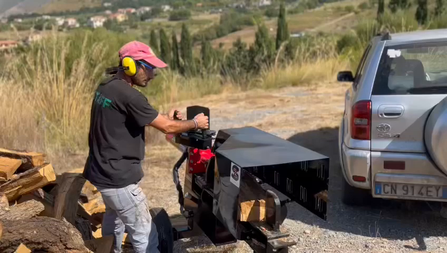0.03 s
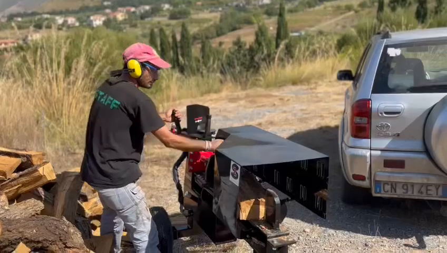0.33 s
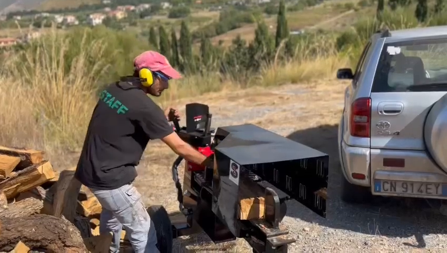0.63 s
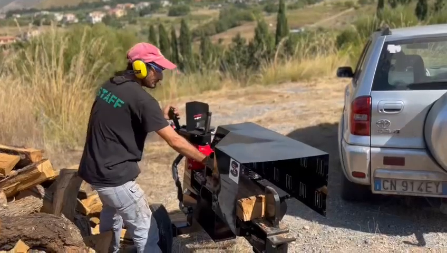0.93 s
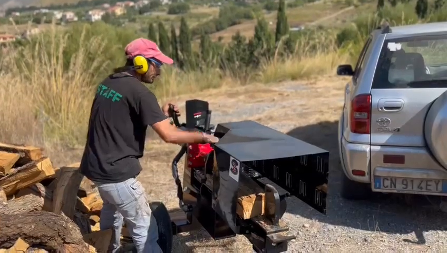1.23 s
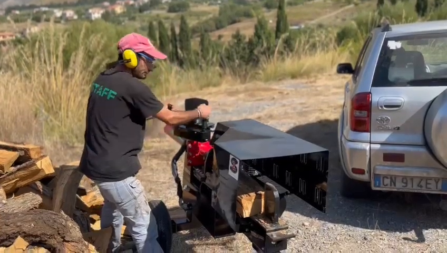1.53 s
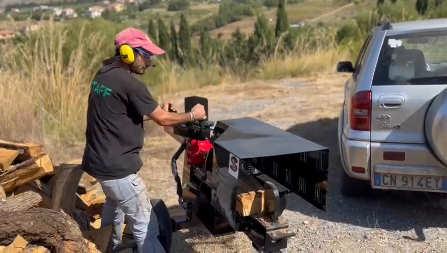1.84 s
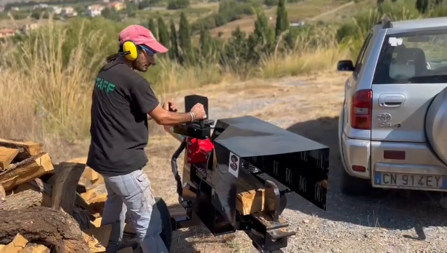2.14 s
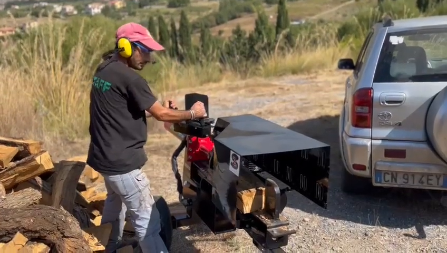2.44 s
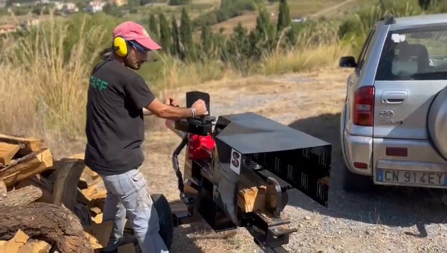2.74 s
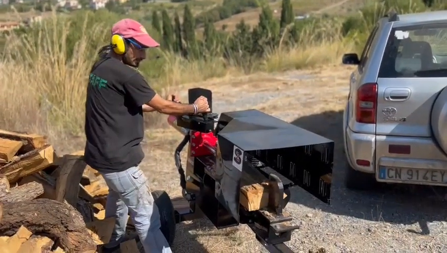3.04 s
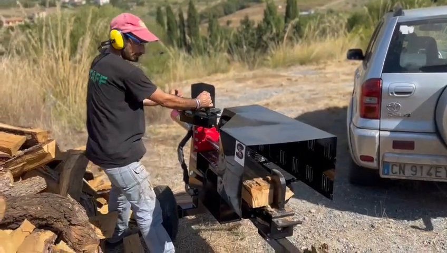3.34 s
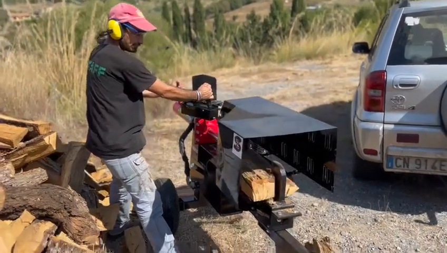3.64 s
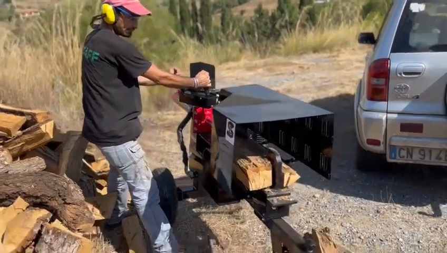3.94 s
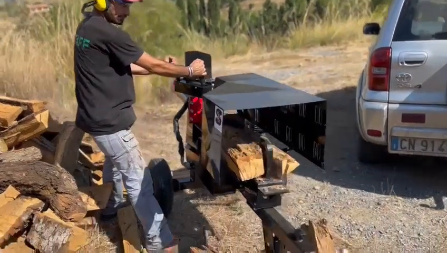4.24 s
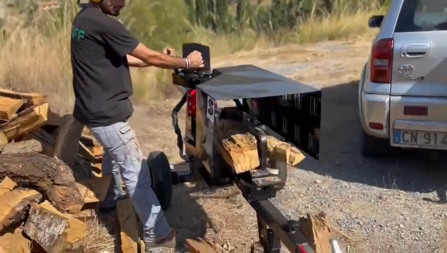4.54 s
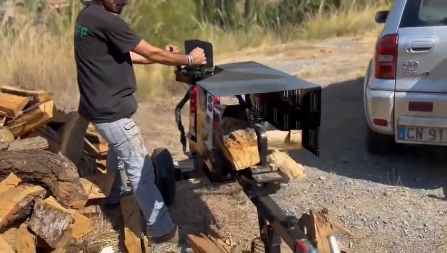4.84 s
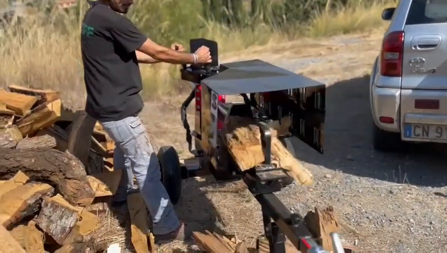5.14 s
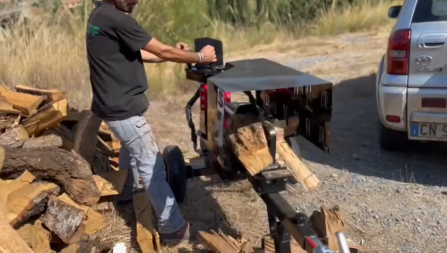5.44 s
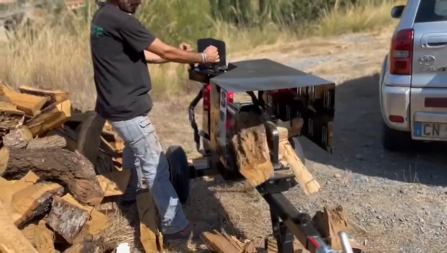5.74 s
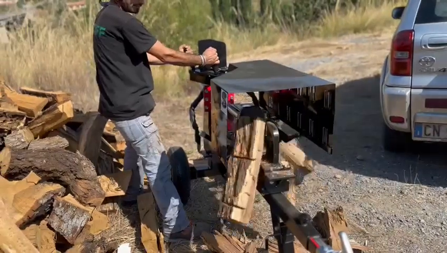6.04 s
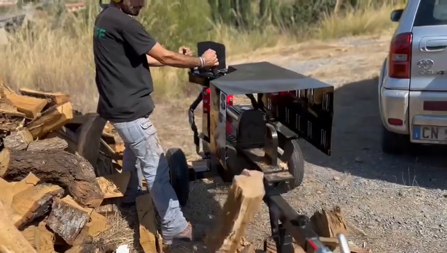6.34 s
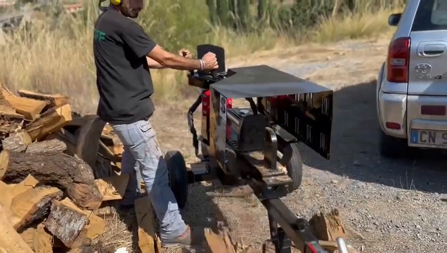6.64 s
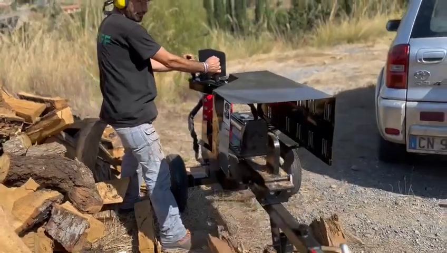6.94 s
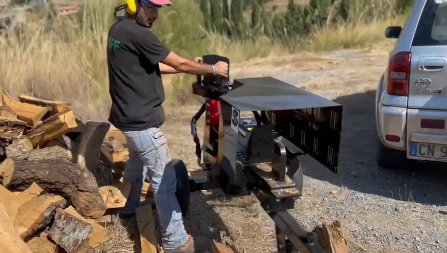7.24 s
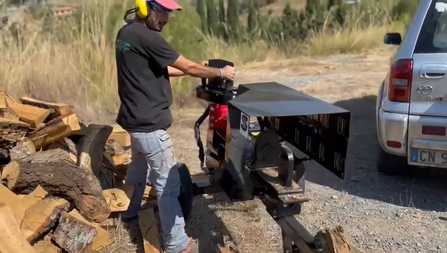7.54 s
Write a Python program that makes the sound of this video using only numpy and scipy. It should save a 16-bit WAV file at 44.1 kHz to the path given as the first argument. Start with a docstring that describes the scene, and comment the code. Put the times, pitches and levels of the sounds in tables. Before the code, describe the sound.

Wood snaps and grinds against a splitter's wedge over a steady, rattling engine, and a split piece knocks down on stones.

```python
"""Outdoors on gravel, a petrol log splitter runs at a governed speed. Its one four-stroke cylinder puffs
through a muffler, rattles the casing, rings its panels and drives a hissing fan and a whining pump.
The ram takes up load and the log fractures on the wedge: fibres tear, the wood cracks and rings, the
steel bed knocks, and stick-slip friction makes the halves groan and squeak. A split piece drops on the
stones and topples over, and the whine shifts upward as the ram runs back."""
import sys
import numpy as np
from scipy import signal
from scipy.fft import rfft, irfft
from scipy.io import wavfile
from scipy.ndimage import uniform_filter1d

SR = 44100
rng = np.random.default_rng(int(sys.argv[2]) if len(sys.argv) > 2 else 0)


def to_wav(s):
    """Save 16-bit WAV."""
    ch = np.atleast_2d(s).T  # columns
    pcm = np.round(np.clip(ch, -1, 1) * 32767)  # PCM
    wavfile.write(sys.argv[1], SR, pcm.astype(np.int16))


N = 343980
TIME = np.arange(N) / SR
DIRECT = np.array([[1], [0]])   # of the two sound paths, direct and scattered, only the first


def from_db(db):
    """Decibels to amplitude ratio."""
    return 10 ** (np.asarray(db) / 20)


def rms_one(x):
    """Normalisation to rms 1."""
    return x / np.sqrt(np.mean(x ** 2) + 1e-20)


def in_time(rows):
    """Linear interpolation of each column at every sample."""
    times, *columns = np.transpose(rows)
    return [np.interp(TIME, times, column) for column in columns]


def colour(x, points):
    """Zero-phase filtering by an outline of (frequency_hz, gain_db)."""
    hz, db = np.transpose(points)
    bins = np.maximum(np.arange(N // 2 + 1) * SR / N, 1)
    return irfft(rfft(x) * from_db(np.interp(np.log(bins), np.log(hz), db)), N)


def drift(rate):
    """Random fluctuation of rms 1, with `rate` new values a second."""
    knots = rng.standard_normal(4000)
    return rms_one(np.interp(TIME * rate, np.arange(len(knots)), knots))


def noise():
    """Uncorrelated white noise on each path."""
    return rng.standard_normal((2, N))


def grains(per_s, spread_db):
    """A Poisson train of uneven clicks, with a separate strength on each path."""
    born = rng.random(N) < per_s / SR
    size = from_db(spread_db * np.minimum(rng.exponential(1, N), 4))
    return rms_one(born * size * noise())


def repeating(phase, size=1024):
    """Periodic noise: each path repeats a rough pattern on every cycle."""
    patterns = rng.standard_normal((2, size))
    return np.array([rms_one(np.interp(phase % 1, np.arange(size) / size, p)) for p in patterns])


def once_a_cycle(phase, place, width):
    """A Gaussian pulse at one place in the engine cycle."""
    return np.exp(-.5 * (((phase - place + .5) % 1 - .5) / width) ** 2)


def swell(start, hold, attack, release):
    """An exponential rise up to the start time, a hold and an exponential decay."""
    early, late = np.maximum(start - TIME, 0), np.maximum(TIME - start - hold, 0)
    return np.exp(-np.minimum(early / attack + late / release, 20))


def burst(start, length):
    """An envelope that holds for about its length, then falls as the inverse square of time."""
    age = np.maximum(TIME - start, 0)
    return (1 - np.exp(-age / .0003)) / np.sqrt(1 + (age / length) ** 4)


def resonate(x, hz, width):
    """Forced response of a two-pole resonator with peak gain 1."""
    r = np.exp(-np.pi * abs(width) / SR)
    feedback = [1, -2 * r * np.cos(2 * np.pi * hz / SR), r * r]
    return signal.lfilter(np.array([1, 0, -1]) * (1 - r * r) / 2, feedback, x + 1e-18)


def struck(start, hz, t60):
    """Free decay of one damped mode after a blow."""
    age = np.maximum(TIME - start, 0)
    return from_db(-60 * np.minimum(age / t60, 3)) * np.sin(2 * np.pi * hz * age)


def crank_throb(phase, level_db):
    """A four-stroke crank turns twice a cycle, so it throbs at the second harmonic."""
    return np.sqrt(2) * from_db(level_db + .13) * np.cos(4 * np.pi * (phase - .03)) * DIRECT


# muffler chambers: resonance_harmonic, delay_turns, round_trip_cycles, straight_share
MUFFLER_CHAMBERS = [(3.5, .47, .236, .92), (7.5, .96, .134, .86), (14.5, .5, .134, .97)]
def muffler_lag(harmonics):
    """Dispersion: the pipe smears the puff, and each chamber echoes the band above its resonance."""
    lag = np.zeros(len(harmonics))
    for resonance, turns, trip, straight in MUFFLER_CHAMBERS:
        echo = np.exp(-2j * np.pi * harmonics * trip)
        all_pass = (straight + echo) / (1 + straight * echo)
        lag = np.where(harmonics > resonance, 2 * np.pi * turns - np.angle(all_pass), lag)
    return np.pi + .0081 * harmonics ** 2 + lag


def puff_train(phase, spectrum, lag, tilt_db, size=256):
    """Fourier synthesis of one puff per firing, without the crank throb and the steady engine tones."""
    orders, db = np.transpose(spectrum)
    k = np.arange(size // 2 + 1)
    roll_off_db = 36 * np.log2(np.maximum(k / orders[-1], 1))
    level_db = np.interp(k, orders, db) + tilt_db * k / orders[-1] - roll_off_db
    cepstrum = irfft(np.log(from_db(uniform_filter1d(level_db, size=5))))
    minimum_phase = 2 * rfft(cepstrum[:size // 2], size).imag   # the muffler rings after the puff
    lines = from_db(level_db) * np.exp(1j * (minimum_phase - lag[:len(k)]))
    lines *= ~np.isin(k, [0, 2] + [round(row[0]) for row in ENGINE_TONES])
    lines /= np.linalg.norm(lines[4:8]) * np.sqrt(2)
    cycle = irfft(lines, 8 * size) * 8 * size
    return np.interp(phase % 1, np.arange(len(cycle)) / len(cycle), cycle)


# exhaust spectra running free, pushing the log and at full load: harmonic, relative_db
FREE_SPECTRUM = [(1, -38.5), (2, 0.0), (3, -9.5), (4, -4.0), (5, -7.5), (6, -6.0), (7, -12.0), (8, -19.0),
                 (9, -9.5), (10, -10), (11, -12), (12, -11), (13, -19.5), (14, -22.5), (15, -22.5),
                 (17, -12), (18, -12.5), (19, -21.5), (20, -18.5), (21, -20), (23, -21.0), (24, -24.0),
                 (25, -22.5), (26, -18.5), (27, -17.5), (30, -19.0), (31, -22.5), (32, -19.0), (33, -25.5),
                 (34, -25.0), (35, -29.5), (36, -24.5), (37, -27.0), (38, -26.0), (39, -33.5), (40, -23.5),
                 (41, -30.5), (42, -25.5), (43, -27.0), (44, -25.5), (45, -24.5), (47, -21.5)]
PUSHING_SPECTRUM = [(1, -34.5), (2, 0.0), (3, -9.0), (4, -2.5), (5, -4.5), (6, -2.0), (7, -8.5), (8, -17.5),
                    (9, -15), (10, -15.5), (11, -16.0), (12, -14.0), (13, -10.5), (14, -25.0), (15, -20.0),
                    (17, -17.0), (18, -13.0), (19, -16.0), (20, -18), (21, -17.5), (23, -16.5), (24, -15.5),
                    (25, -20.0), (26, -19.5), (27, -21), (30, -20.5), (31, -24), (32, -20.0), (33, -32.5),
                    (34, -18.5), (35, -25.0), (36, -21.0)]
LOADED_SPECTRUM = [(1, -38.5), (2, 0.0), (3, -10.0), (4, -6.0), (5, -8.0), (6, -5.5), (7, -10.5),
                   (8, -17.5), (9, -10), (10, -14.5), (11, -16.5), (12, -10), (13, -12.5), (14, -20.0),
                   (15, -25.0), (17, -15.5), (18, -15), (19, -20.0), (20, -34.0), (21, -21.5), (23, -27.0),
                   (24, -19.5), (25, -22.0), (26, -18.0), (27, -19.0), (30, -25), (31, -32.0), (32, -25.5),
                   (33, -29.0), (34, -21.5), (35, -28.5), (36, -27.0), (37, -23.5), (38, -28.0),
                   (39, -28.5), (40, -16.5), (41, -38.5), (42, -22.5), (43, -31.5), (44, -24.0),
                   (45, -20.0), (47, -24.5)]
def exhaust_note(phase, load, level_db):
    """Periodic puffs give a harmonic series whose balance follows the load."""
    uneven = phase + .00097 * drift(45)   # no two firings are alike
    k = np.arange(1000)
    scatter = np.clip((k - 8) / 18, 0, 3) * rng.standard_normal(len(k))   # high orders take many paths
    lag = muffler_lag(k) + scatter
    free, loaded = np.clip(1 - 2 * load, 0, 1), np.clip(2 * load - 1, 0, 1)
    note = (free * puff_train(uneven, FREE_SPECTRUM, lag, tilt_db=-4)
            + (1 - free - loaded) * puff_train(uneven, PUSHING_SPECTRUM, lag, tilt_db=3)
            + loaded * puff_train(uneven, LOADED_SPECTRUM, lag, tilt_db=-3))
    return note * from_db(level_db + .14 + .5 * drift(31)) * DIRECT


# blows of exhaust, muffler rattle, valve and piston: place_cycles, width_cycles, strength
CYCLE_BLOWS = [(.06, 0.012, 0.24), (.25, 0.086, 0.29), (.74, 0.076, 2.9), (0.9, 0.029, 0.62)]
def blows(phase):
    """Periodic excitation: four pulses in each cycle."""
    return sum(strength * once_a_cycle(phase, place, width) for place, width, strength in CYCLE_BLOWS)


# spectra of the rough gas and of its bark: frequency_hz, gain_db
GAS_SPECTRUM = [(20, -1.5), (40, -7), (90, 1.5), (170, -2), (260, -2.5), (360, 0.5), (470, -6.5),
                (700, -10.5), (1000, -14.5), (1400, -38), (3000, -51.5)]
BARK_SPECTRUM = [(150, -25), (290, -4), (480, -0.5), (620, 3.5), (850, -1), (1100, -7.5), (1700, -14.5),
                 (3000, -52.5)]
def exhaust_gas(phase, gas_db):
    """Modulated flow noise: the gas surges on each blow and barks as the exhaust valve opens."""
    gas = rms_one(colour(noise() * (5 + blows(phase)), GAS_SPECTRUM))
    valve_open = once_a_cycle(phase, place=.049, width=.062)
    bark = rms_one(colour(noise() * valve_open, BARK_SPECTRUM))
    return gas * from_db(gas_db) + bark * from_db(-35.8)


# response of the casing: frequency_hz, gain_db
CASING_SPECTRUM = [(500, -44), (800, 2), (1100, 1), (1350, 1.5), (1700, -2), (2050, -2), (2450, -4.5),
                   (2900, -11.5), (3600, -17), (6000, -69)]
# panel modes: frequency_hz, nominal_width_hz, free_db, loaded_db
PANEL_MODES = [(900, 56, -36, -40.5), (1456, 62, -37.7, -60), (1418, 46, -56, -38.7)]
def clatter(phase, load, clatter_db):
    """Forced vibration: valve gear and pump rattle the casing, and each firing kicks its panels."""
    taps = 4 + .22 * blows(phase)
    rattle = noise() + .3 * repeating(phase + .0025 * drift(4)) + .64 * grains(2500, spread_db=4)
    casing = rms_one(colour(rattle * taps, CASING_SPECTRUM)) * from_db(clatter_db - .5)
    kick = 7 * once_a_cycle(phase, place=.9, width=.07)
    shaking = (noise() + .76 * repeating(phase)) * (taps + kick)
    panels = 0
    for hz, width, free_db, loaded_db in PANEL_MODES:
        ring = resonate(resonate(shaking, hz, 1.23 * width), hz, 1.23 * width)
        panels += rms_one(ring) * from_db(free_db + load * (loaded_db - free_db))
    return casing + panels * from_db(clatter_db - np.mean(clatter_db))


# spectrum of the cooling air: frequency_hz, gain_db
AIR_SPECTRUM = [(1650, -6.5), (2800, -11), (2910, 3.5), (3160, -2.5), (3620, 4), (3970, 1), (4350, 2.5),
                (5230, -2.5), (6280, 0), (7580, -3), (8260, -1.5), (9110, -5), (9980, -13.5),
                (10400, -30.5), (11000, -63), (14300, -68), (22000, -120)]
def cooling_air(phase, hiss_db):
    """Amplitude modulation: broadband fan hiss swells as the cylinder fires."""
    surge = 1 + .43 * once_a_cycle(phase, place=.75, width=.089)
    hiss = noise() + .42 * grains(2000, spread_db=1)
    return rms_one(colour(hiss * surge, AIR_SPECTRUM)) * from_db(hiss_db - 3.5)


# steady engine tones, the pump's whine (16-29) and the casing panels ringing near 1450 Hz (46-48):
# harmonic, free_db, pushing_db, loaded_db, returning_db
ENGINE_TONES = [(16, -38, -40, -33.5, -42), (22, -45, -35.5, -36, -49), (28, -42, -45, -48, -34.5),
                (29, -40, -45, -42.5, -38), (46, -48, -55, -41, -46), (47, -47, -55, -45, -52),
                (48, -41, -58, -45.5, -40)]
RETURN_S, RETURN_RISE_S = 7.08, .33   # the ram starts to run back
def engine_tones(phase, load):
    """Harmonics locked to the cycle: pump whine and panel ring change balance with the ram's work."""
    returning = np.clip((TIME - RETURN_S) / RETURN_RISE_S, 0, 1)
    from_crest = phase - .0572   # the partials crest together here
    tones = 0
    for harmonic, *working_db, return_db in ENGINE_TONES:
        db = (1 - returning) * np.interp(load, (0, .5, 1), working_db) + returning * return_db
        angle = 2 * np.pi * round(harmonic) * from_crest + .25 * drift(22)
        flutter_db = 1.8 * drift(12)
        tones += np.sqrt(2) * from_db(db + flutter_db) * np.cos(angle)
    return tones * DIRECT


# the governed speed sags while the ram works: time_s, firing_rate_hz
FIRING_RATE = [(0, 30.89), (1.6, 30.975), (1.9, 30.665), (2.6, 30.65), (2.9, 30.405), (3.6, 30.515),
               (5.2, 30.62), (5.7, 30.905), (6.7, 30.63), (7.2, 31.03), (7.8, 30.955)]
# hydraulic load (0 free, .5 pushing the split log, 1 forcing the wedge in): time_s, load_share
RAM_LOAD = [(0, 0.038), (1.7, 0.091), (1.86, 0.92), (3.58, 0.92), (3.72, 0.58), (4.3, 0.48), (6.85, 0.41),
            (7.15, 0.31), (7.8, 0.11)]
# nominal levels in those three states: throb_db, note_db, gas_db, clatter_db, hiss_db
FREE_LEVELS = (-24.5, -25.5, -31, -30.5, -35)
PUSHING_LEVELS = (-27.5, -25, -31.5, -32.5, -37)
LOADED_LEVELS = (-23, -25.5, -30.5, -29.5, -34.5)
# the steel guard comes between engine and listener, then clears: time_s, clatter_change_db
GUARD_SCREENING = [(0, 0), (4.2, 1), (5.5, -1), (6.8, 0), (7.4, 1.3)]
def engine():
    """Synchronous sources: all share one cycle and follow the load; the guard screens clatter and hiss."""
    (firing_hz,), (load,) = in_time(FIRING_RATE), in_time(RAM_LOAD)
    (screen_db,) = in_time(GUARD_SCREENING)
    phase = .508 + np.cumsum(firing_hz) / SR   # in cycles
    levels = zip(FREE_LEVELS, PUSHING_LEVELS, LOADED_LEVELS)
    throb_db, note_db, gas_db, clatter_db, hiss_db = (np.interp(load, (0, .5, 1), db) for db in levels)
    return (crank_throb(phase, throb_db) + exhaust_note(phase, load, note_db)
            + exhaust_gas(phase, gas_db) + clatter(phase, load, clatter_db + screen_db)
            + cooling_air(phase, hiss_db + 1.06 * screen_db) + engine_tones(phase, load))


# the log's resonances: frequency_hz, width_hz, gain_db
LOG_MODES = [(400, 200, -22), (680, 250, -15), (970, 340, 4.5), (1383, 204, 8.5), (1866, 113, 7),
             (2274, 255, 8), (2590, 660, 2), (3490, 790, -1), (4320, 560, 1), (6100, 3100, -3),
             (6900, 350, 3.5), (7520, 960, -6.5), (9500, 2900, -7.5)]
def log_body(force):
    """Modal superposition: snaps ring briefly in the damped wood."""
    return sum((-1) ** k * from_db(db) * resonate(force, hz, width)
               for k, (hz, width, db) in enumerate(LOG_MODES))


# resonances of the halves: frequency_hz, width_hz, level_re_grinding_db
GROAN_MODES = [(372, 37, -9), (620, 57, -9.5), (1206, 100, -14.5)]
def groaning(slips_per_s=75):
    """Stick-slip friction rings the log's halves, whose pitch bends as the wedge opens them."""
    travel = np.cumsum(slips_per_s * np.exp(.35 * drift(50))) / SR
    slips = np.diff(np.floor(travel), prepend=0) * from_db(2.7 * drift(40))
    bent_time = np.cumsum(1 + .025 * drift(7)) / SR
    return DIRECT * sum(from_db(db) * rms_one(np.interp(bent_time, TIME, resonate(slips, hz, width)))
                        for hz, width, db in GROAN_MODES)


# splinter resonances: frequency_hz, width_hz, relative_db
SPLINTER_MODES = [(1656, 60, -2), (1960, 110, -0.5), (2200, 68, 2), (2610, 98, 2.5)]
def splinters():
    """Impulse excitation: splinters snap at random and ring."""
    return rms_one(sum(from_db(db) * rms_one(resonate(grains(160, spread_db=0), hz, width))
                       for hz, width, db in SPLINTER_MODES))


# the log slips along the wedge: start_s, hold_s, grinding_db, tearing_db, crackling_db
LOG_SLIPS = [(2.762, 0.018, -26.5, -43, -39), (2.838, 0.33, -39, -35.5, -41), (3.42, 0.15, -42, -33.5, -36),
             (3.777, 0.045, -46, -34, -42), (3.975, 0.15, -30, -39, -42), (4.2, 0.12, -23.5, -35.5, -40),
             (4.516, 0.28, -32.5, -44.5, -45), (4.901, 0.097, -30, -38.5, -41),
             (5.07, 0.084, -27, -38, -46)]
# spectrum of wood grinding on steel: frequency_hz, gain_db
GRIND_SPECTRUM = [(120, -29), (250, 1), (335, 6), (395, 13.5), (465, -5), (560, 6), (645, 6.5), (740, 3),
                  (900, 6.5), (1150, 0), (1700, -3), (2400, -20), (3200, -28), (9000, -49)]
def splitting():
    """Fracture and friction: at each slip fibres tear, splinters snap and the halves grind the wedge."""
    tear, grind, crackle = np.zeros((3, N))
    for start, hold, grind_db, tear_db, crackle_db in LOG_SLIPS:
        motion = swell(start, hold, attack=.016, release=.088)
        tear += from_db(tear_db) * motion
        grind += from_db(grind_db) * motion
        crackle += from_db(crackle_db) * motion
    fibres = grains(1500 * from_db(5 * np.tanh(drift(40))), spread_db=2)
    tearing = rms_one(log_body(fibres)) * tear
    friction = grains(3000, spread_db=2) * from_db(2 * drift(60))
    grinding = (rms_one(colour(friction, GRIND_SPECTRUM)) + groaning()) * grind
    crackling = splinters() * crackle
    jerks = from_db(2.1 * np.clip(drift(24), -2, 2))   # the log advances in jerks
    return (tearing + grinding + crackling) * rms_one(jerks)


# the log cracks: start_s, level_db, length_s, brightness_db, pitch_hz, ring_db
LOG_CRACKS = [(2.763, -23.5, 0.017, -15, 1160, -28), (2.846, -31.5, 0.022, 6, 1890, -28),
              (2.876, -35, 0.0036, 5, 1390, -37), (2.9115, -19.5, 0.0048, 0.5, 1930, -19),
              (3.098, -35, 0.0051, 8.5, 2220, -40), (3.13, -34, 0.011, 0, 1410, -27),
              (3.192, -31.5, 0.0087, 0, 1390, -30), (3.255, -18, 0.007, -10, 1290, -19.5),
              (3.296, -27.5, .006, -11, 2220, -35), (3.425, -28.5, 0.004, -7, 3280, -31.5),
              (3.445, -24, 0.005, -10, 2270, -27), (3.5215, -39, 0.0045, -8, 2000, -37),
              (3.58, -30.5, 0.0067, 6, 2300, -27), (3.6181, -28, 0.003, 4, 1884, -24),
              (3.6217, -17.8, 0.0043, 5.5, 2190, -19), (3.7175, -32, .004, 1, 2000, -35),
              (3.777, -18.5, .0028, -4, 1460, -19.5), (3.823, -40, .012, 11, 2220, -43),
              (3.954, -28, 0.0075, -1.5, 1670, -35), (4.537, -28.5, 0.0052, -4, 1900, -32.5)]
def cracks(crossover_hz=2800):
    """Brittle fracture: one snap sets off an avalanche of breaking fibres, and the freed wood rings."""
    avalanche = grains(9000, spread_db=-1.5)
    dull, bright, ringing = np.zeros((3, 2, N))
    for start, db, length, brightness_db, hz, ring_db in LOG_CRACKS:
        force = avalanche * burst(start, length)
        force[0, round(start * SR)] += 9   # the first snap
        dull += from_db(db - .26 * brightness_db) * force
        bright += from_db(db + brightness_db) * force
        build_up = 1 - np.exp(-np.maximum(TIME - start, 0) / .0017)
        ringing += from_db(ring_db) * build_up * struck(start, hz, t60=.04) * [[2.6], [-1.2]]
    low = signal.sosfilt(signal.butter(2, crossover_hz, fs=SR, output="sos"), dull)
    high = signal.sosfilt(signal.butter(2, crossover_hz, "high", fs=SR, output="sos"), bright)
    return log_body(low - high) / np.std(log_body(avalanche)) + ringing


# the log jolts as it gives: start_s, level_db
LOG_JOLTS = [(2.7645, -23), (2.772, -20), (2.78, -16), (3.256, -26)]
# modes of the steel bed: frequency_hz, gain_db, t60_s
BED_MODES = [(267, -3.5, .05), (360, 3, 0.055), (530, -7, .045), (633, -8, .04), (1110, -6, .04)]
def bed_knocks():
    """Impact excitation: each jolt rings the low modes of the bed."""
    return DIRECT * sum((-1) ** k * from_db(db + mode_db) * struck(start, hz, t60)
                        for start, db in LOG_JOLTS for k, (hz, mode_db, t60) in enumerate(BED_MODES))


# wood squeaks on the steel wedge: start_s, level_db, length_s, pitch_hz
WEDGE_SQUEAKS = [(3.189, -18.5, 0.012, 1624), (3.265, -24, 0.0068, 1320), (3.444, -22, 0.0037, 1440)]
def squeaks():
    """Stick-slip oscillation: short tones with an unsteady pitch and a weak octave."""
    angle_per_hz = 2 * np.pi * np.cumsum(1 + .07 * drift(300)) / SR
    out = np.zeros(N)
    for start, db, length, hz in WEDGE_SQUEAKS:
        tone = np.sin(hz * angle_per_hz) + .17 * np.sin(2 * hz * angle_per_hz)
        out += from_db(db) * burst(start, length) * tone
    return out * [[1.4], [.5]]


# landing, then toppling: start_s, thud_db, thud_tilt_db_per_octave, gravel_db, gravel_tilt_db_per_octave
LANDINGS = [(6.2021, -11.5, -2, -19, -1.5), (6.6795, -18, 0, -13.5, 1.5)]
# modes of the split piece: frequency_hz, gain_db, t60_s
PIECE_MODES = [(700, -3, .026), (930, 0, .026), (1090, -4, .04), (1400, -5, .022), (1730, -9, .028),
               (2170, -12, .03), (4400, -11, .007), (5300, -12, .006)]
# resonances of the stones: frequency_hz, width_hz, gain_db
STONE_MODES = [(2160, 310, 3), (4500, 270, 2), (5700, 560, 1), (8750, 420, -2)]
REBOUND_S, REBOUND_DB = .0081, -11
def falling_piece():
    """Impact and rebound: each landing rings the piece twice and jostles the stones till they settle."""
    out = np.zeros((2, N))
    for start, thud_db, thud_tilt, gravel_db, gravel_tilt in LANDINGS:
        for touch, touch_db in ((start, thud_db), (start + REBOUND_S, thud_db + REBOUND_DB)):
            for k, (hz, db, t60) in enumerate(PIECE_MODES):
                level_db = touch_db + db + thud_tilt * np.log2(hz / PIECE_MODES[1][0])
                out[0] += (-1) ** k * from_db(level_db) * struck(touch, hz, t60)
        push = swell(start, hold=.003, attack=.0009, release=.003)
        settling = from_db(-14) * burst(start, length=.012)
        contacts = grains(9800, spread_db=-5) * (push + settling)
        for k, (hz, width, db) in enumerate(STONE_MODES):
            level_db = gravel_db + db + gravel_tilt * np.log2(hz / STONE_MODES[1][0])
            out += (-1) ** k * from_db(level_db) * resonate(contacts, hz, width)
    return out


# stereo width: frequency_hz, side_re_mid_db
STEREO_WIDTH = [(60, -13), (130, -44), (250, -19.5), (350, -20), (610, -12), (1090, -11.5), (1500, -0.5),
                (2000, -6), (3200, 0), (4300, -5), (6300, 3.5), (8500, -23.5), (11000, 36.5)]
# stereo balance: frequency_hz, left_re_right_db
STEREO_BALANCE = [(60, .2), (200, .1), (400, .3), (700, -.6), (1100, -.3), (1500, -2), (2200, -2),
                  (2800, -4), (3700, 0), (5000, 2), (6400, 4.5), (7500, 3), (8700, .3)]
def stereo(paths):
    """Mid-side mixing of direct and scattered sound: alike in the bass, apart in the treble."""
    mid, side = paths[0], colour(paths[1], STEREO_WIDTH)
    left = colour(mid + side, [(hz, db / 2) for hz, db in STEREO_BALANCE])
    right = colour(mid - side, [(hz, -db / 2) for hz, db in STEREO_BALANCE])
    return np.array([left, right])


def scene():
    """Superposition of engine, log and falling piece in the open air."""
    return stereo(engine() + splitting() + cracks() + bed_knocks() + squeaks() + falling_piece())


def record(dry, headroom=.85, cutoff_hz=10500):
    """Gating, clipping and low-pass filtering: the sound opens after a moment and loses peaks and top."""
    opened = np.clip((TIME - .0355) / .002, 0, 1)
    clipped = np.clip(dry * opened, -headroom, headroom)
    return signal.sosfilt(signal.ellip(8, .3, 80, cutoff_hz, fs=SR, output="sos"), clipped)


dry = scene()
out = record(dry)
to_wav(out)
```